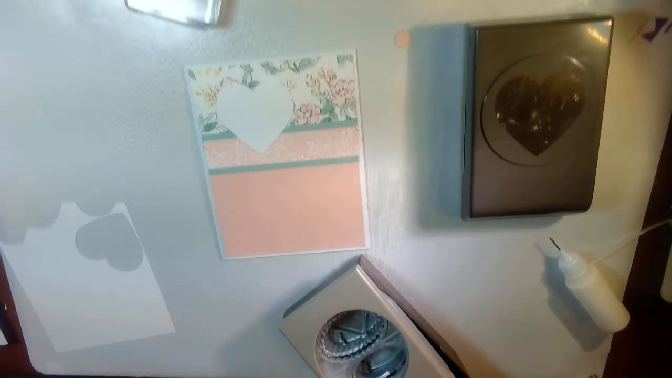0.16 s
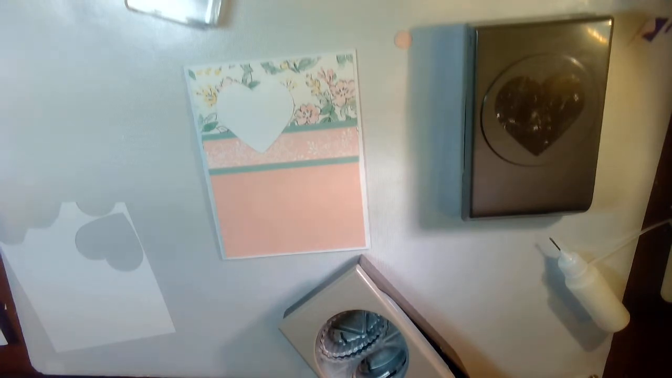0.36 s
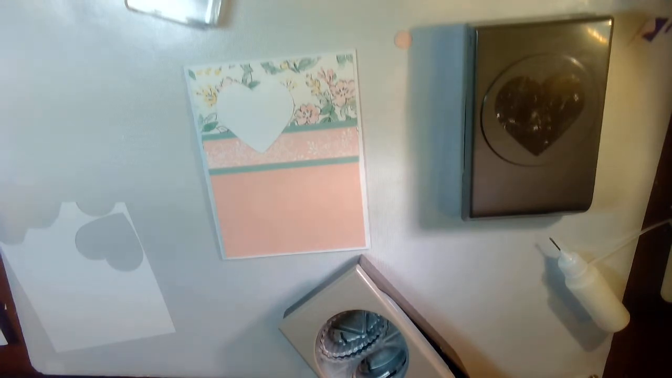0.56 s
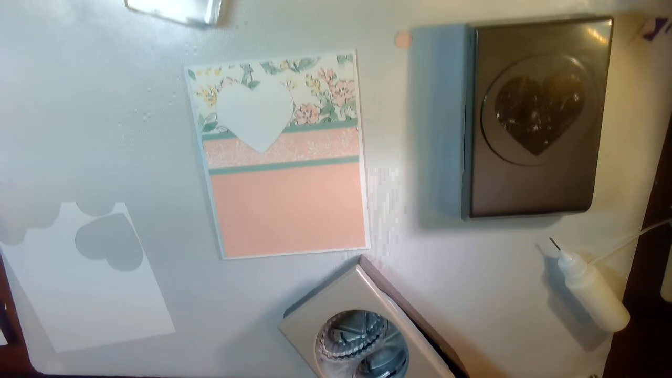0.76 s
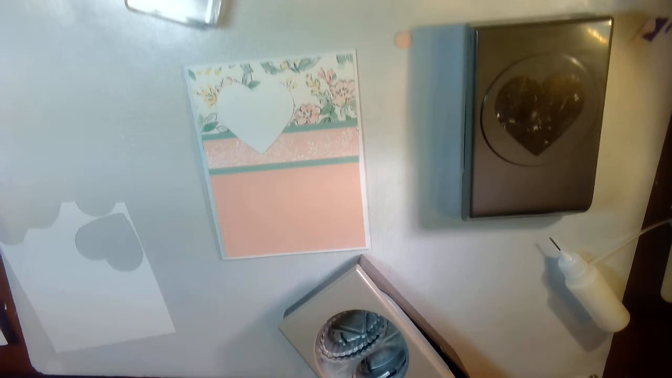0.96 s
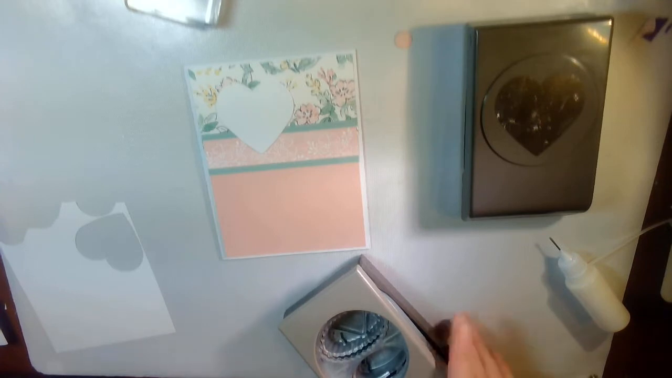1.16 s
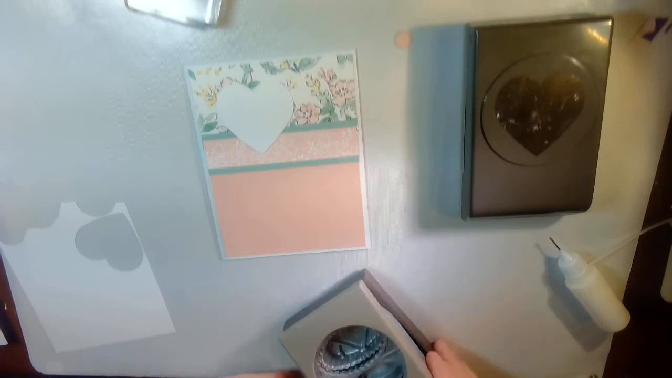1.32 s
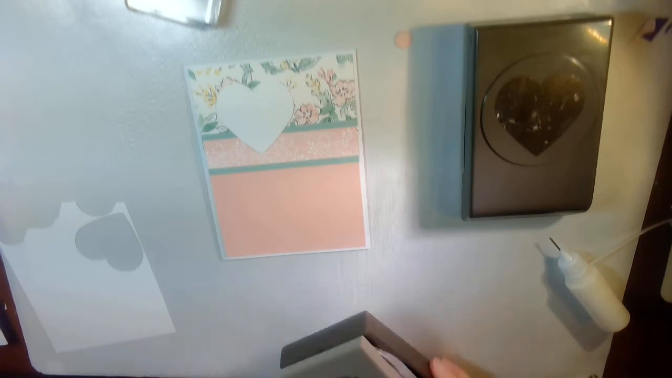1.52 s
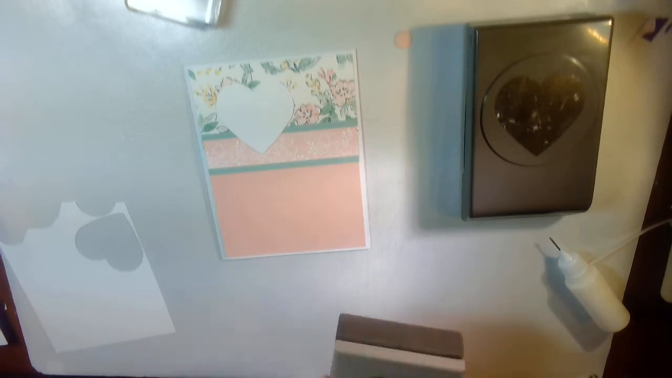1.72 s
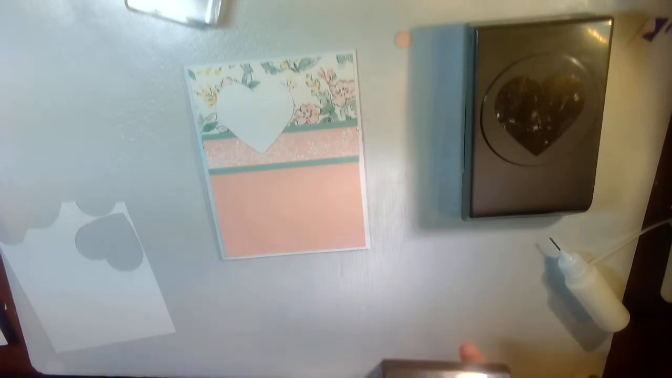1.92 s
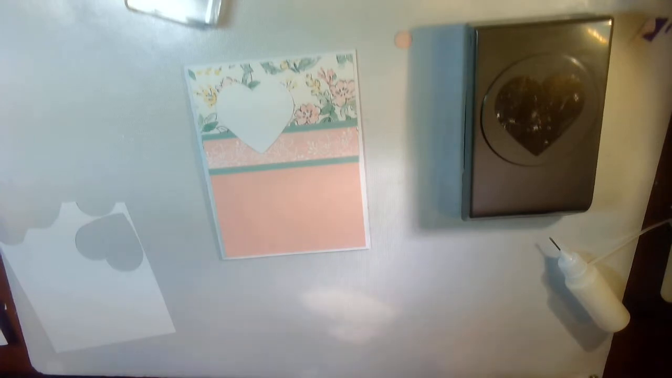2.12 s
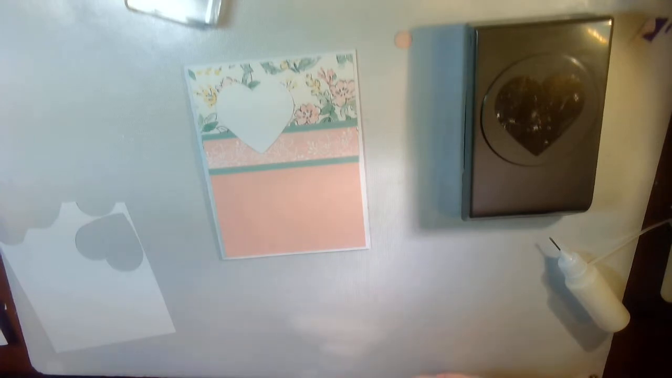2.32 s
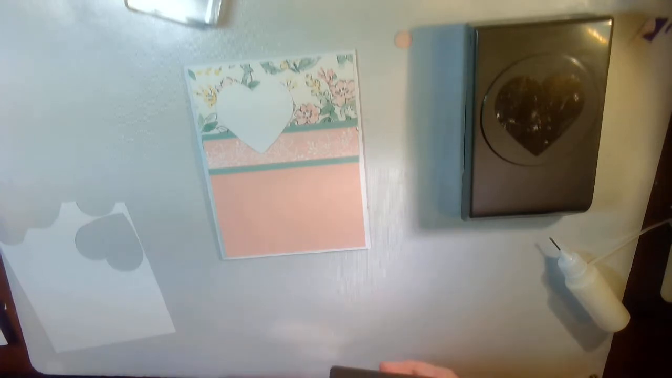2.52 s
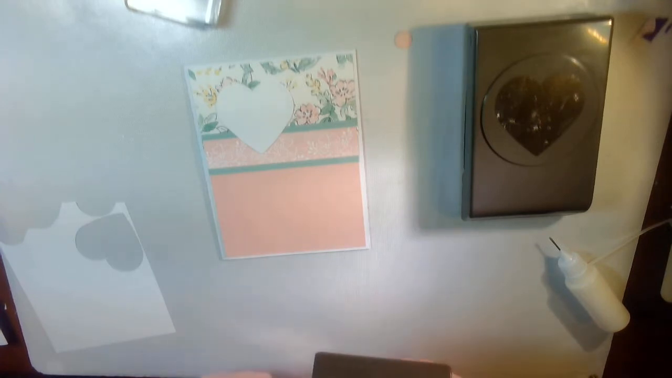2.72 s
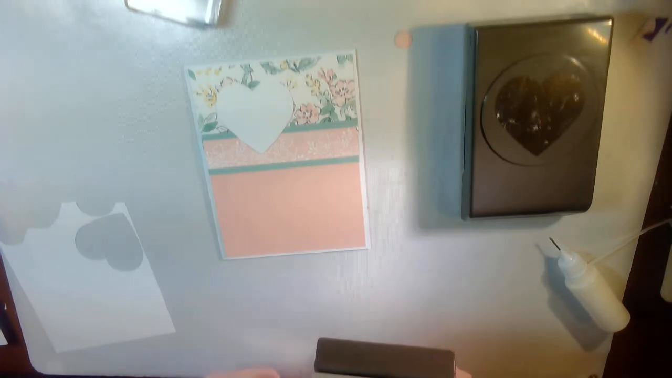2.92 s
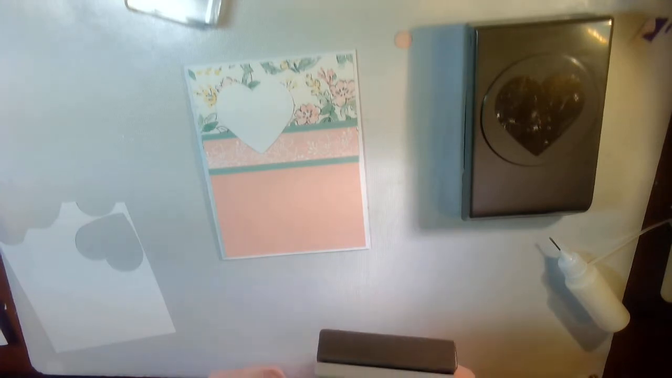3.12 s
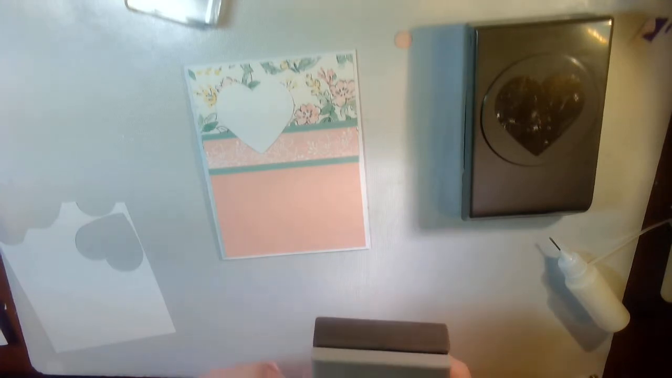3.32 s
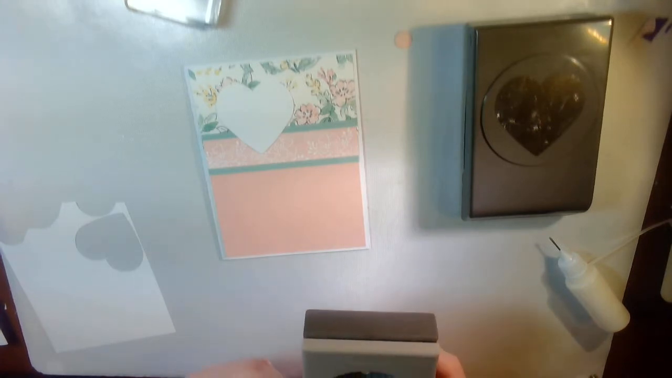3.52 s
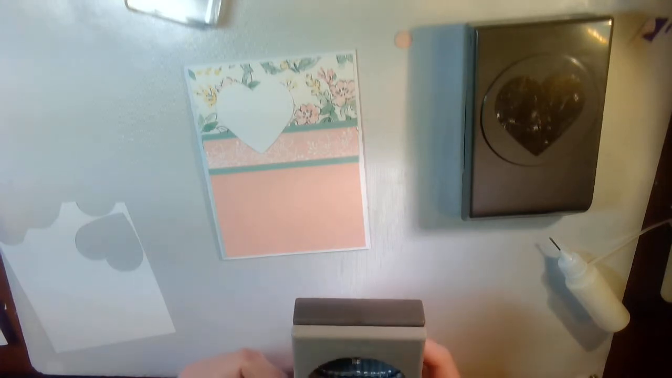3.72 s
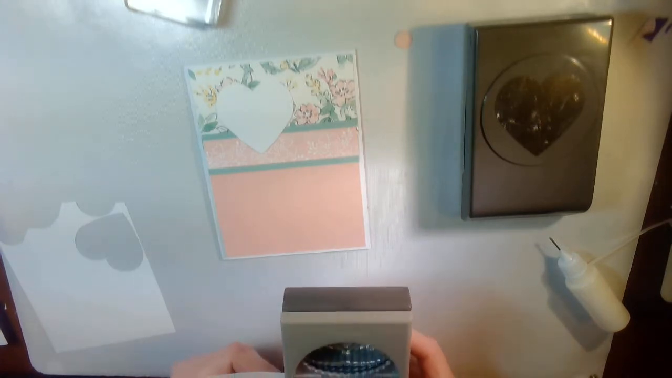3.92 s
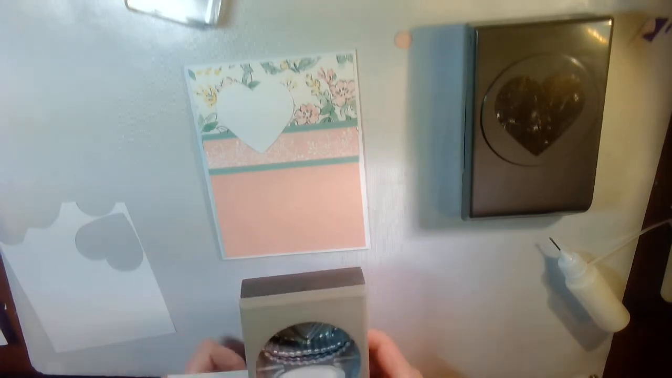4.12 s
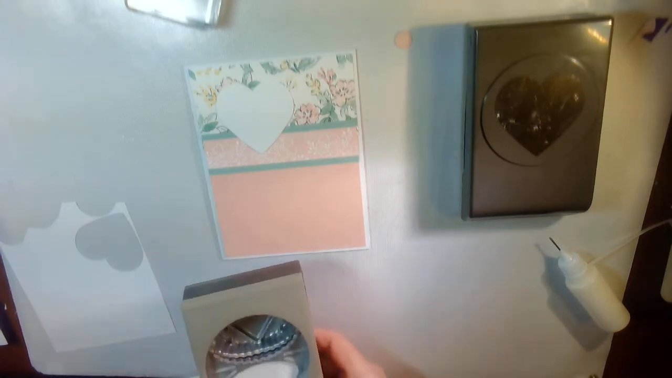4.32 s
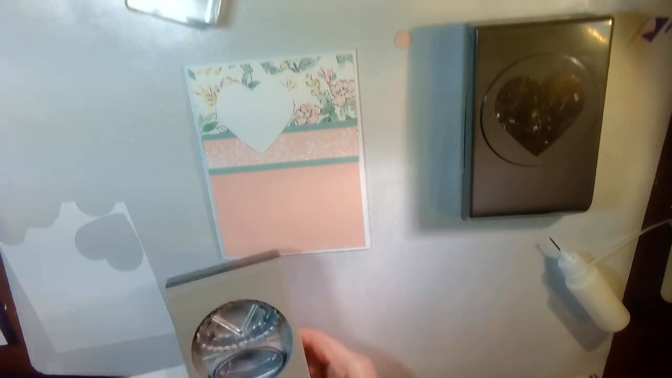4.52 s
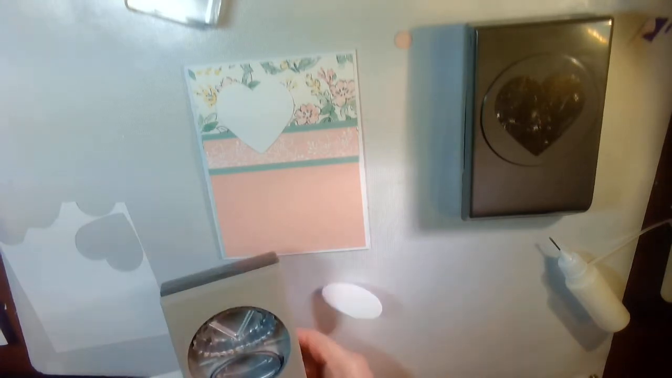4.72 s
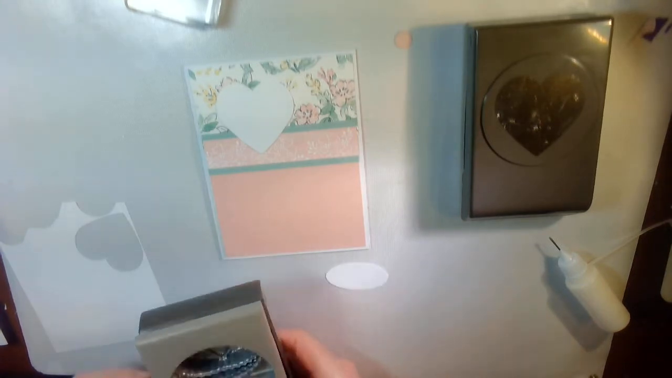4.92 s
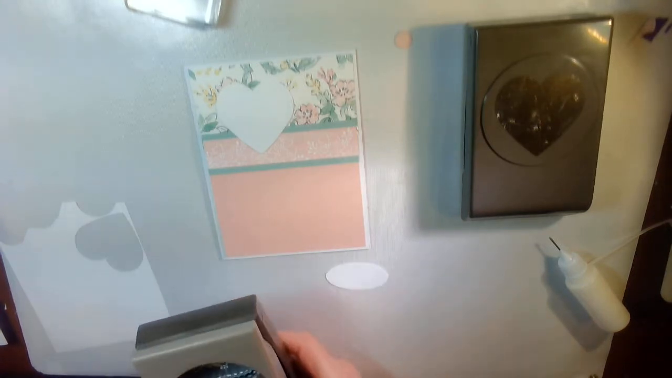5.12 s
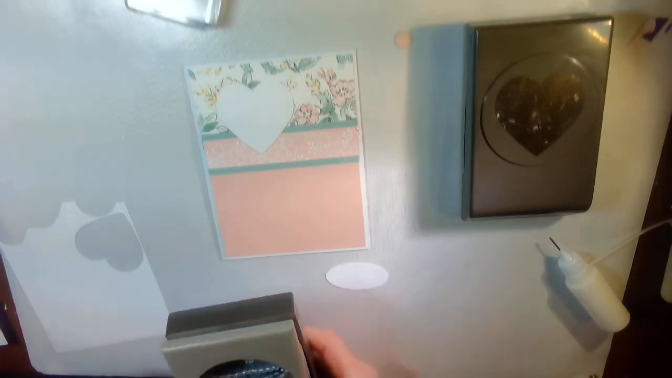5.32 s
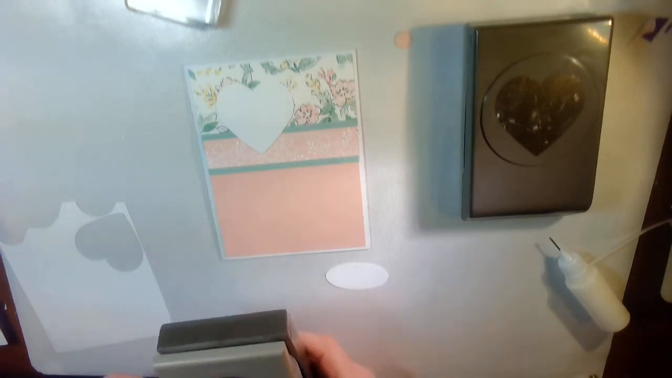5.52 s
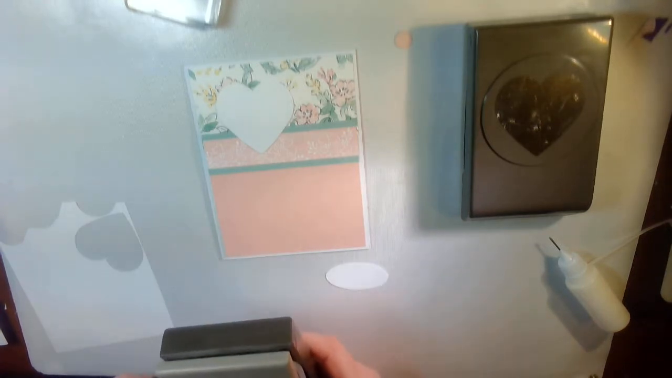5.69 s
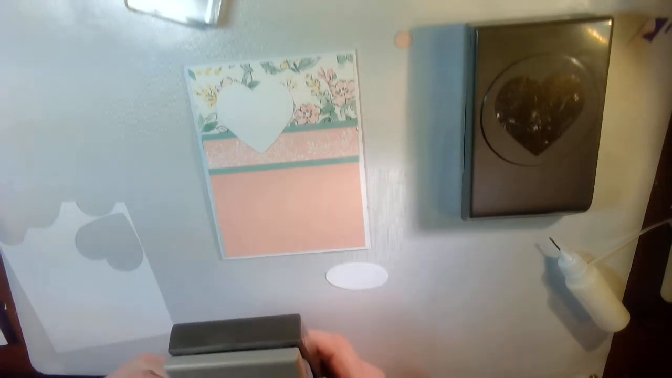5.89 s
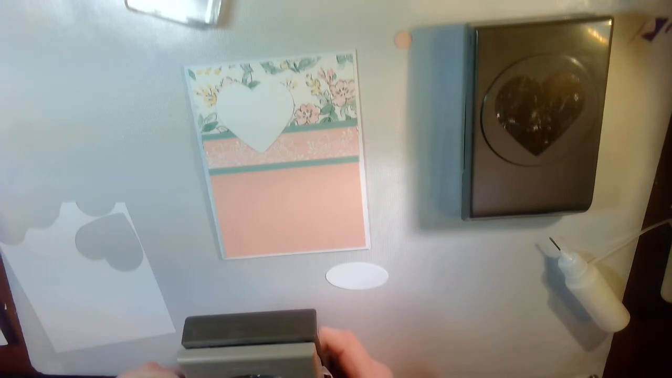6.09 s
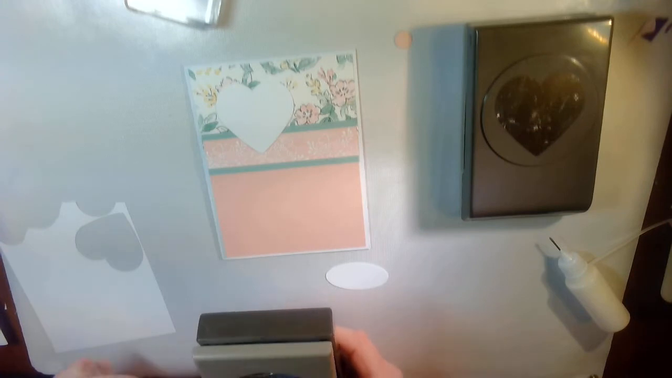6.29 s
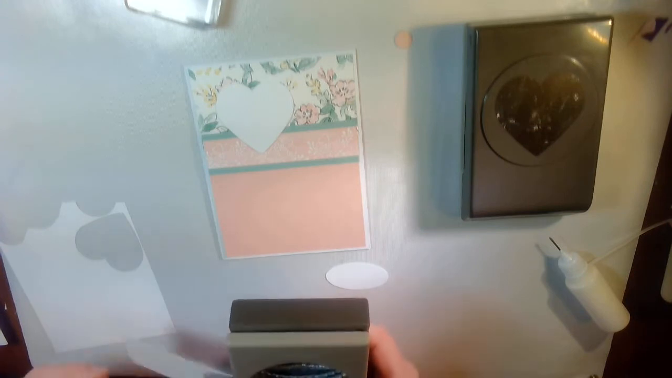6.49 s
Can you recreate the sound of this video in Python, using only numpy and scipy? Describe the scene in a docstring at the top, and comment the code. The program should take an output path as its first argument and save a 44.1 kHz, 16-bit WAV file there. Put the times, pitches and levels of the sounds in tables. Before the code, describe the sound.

Soft paper rubbing and crisp little ticks come first, with a dull table knock as a punch is dragged away and a tiny plastic squeak. After a sparse, nearly silent pause with faint brushes, a very loud double-edged metallic crunch cuts card, with a short room tail. Rougher paper scrapes and snaps follow. Dry, close, treble-peaky sound over constant low electronic noise.

```python
"""First a sheet of paper slides softly over steady electronic noise, then it snaps and rustles under the hands.
A hand punch drags off the table, its housing squeaks, and its die crunches through card; handling goes on.
Slides are noise shaped by hand pressure, snaps are ticks with short bursts of noise, and the punch,
housing and table are noise sent through resonances. All is close to a small, peaky microphone,
and the crunch overloads the input."""
import sys
import numpy as np
from scipy import signal
from scipy.fft import rfft, irfft
from scipy.io import wavfile

SR = 44100
rng = np.random.default_rng(int(sys.argv[2]) if len(sys.argv) > 2 else 0)


def unload_audio(sound):
    """Save the sound as a 16-bit wav file, at the path given as the first command line argument."""
    columns = np.transpose(np.atleast_2d(sound))
    # keep every value between -1 and 1, then stretch to whole-number steps
    steps = np.round(np.clip(columns, -1, 1) * 32767)
    wavfile.write(sys.argv[1], SR, steps.astype(np.int16))


def convert_level_to_amplitude(level_db):
    """Map a level in decibels to its linear amplitude factor."""
    exponent = np.asarray(level_db, float) / 20
    return 10 ** exponent


N = 288855


def rms_one(x):
    """Scale a sound to an average strength (rms) of 1."""
    return x / np.sqrt(np.mean(x ** 2) + 1e-20)


def colour(x, spectrum, size=4096):
    """Minimum-phase filter of unit energy, so nothing sounds before its cause."""
    hz, db = np.transpose(spectrum)
    grid = np.maximum(np.arange(size // 2 + 1) * SR / size, 1)
    gain = convert_level_to_amplitude(np.interp(np.log(grid), np.log(hz), db))
    # folding the cepstrum forward in time makes the filter minimum-phase
    cepstrum = irfft(np.log(gain), size)
    cepstrum[1:size // 2] *= 2
    cepstrum[size // 2 + 1:] = 0
    taps = irfft(np.exp(rfft(cepstrum)), size)
    return signal.fftconvolve(x, taps / np.linalg.norm(taps))[:N]


def drift(rate_hz):
    """Slow random wandering with an rms of 1; a higher rate wanders faster."""
    r = np.exp(-2 * np.pi * rate_hz / SR)
    noise = rng.standard_normal(N + SR)
    wander = signal.lfilter([1], [1, -2 * r, r * r], noise)
    return rms_one(wander[SR:])   # the first second lets the filter settle


def resonance(x, hz, width_hz):
    """One ringing mode; the narrower it is, the longer it rings."""
    r = np.exp(-np.pi * width_hz / SR)
    feedback = [1, -2 * r * np.cos(2 * np.pi * hz / SR), r * r]
    return signal.lfilter([(1 - r * r) / 2, 0, (r * r - 1) / 2], feedback, x)


def modes(x, rows):
    """Parallel resonances of alternating sign; a 0 dB one passes unit energy."""
    total = 0
    for k, (hz, width_hz, db) in enumerate(rows):
        unit_energy = np.sqrt(SR / np.pi / width_hz)
        total = total + (-1) ** k * convert_level_to_amplitude(db) * unit_energy * resonance(x, hz, width_hz)
    return total


def patchy_body(x, rows, patch_db):
    """Resonances that each swell and fade by themselves."""
    total = 0
    for k, mode in enumerate(rows):
        wandering = x * convert_level_to_amplitude(patch_db * drift(16.0))
        total = total + (-1) ** k * modes(wandering, [mode])
    return total


def burst(s, rise_ms, hold_ms, dying_ms):
    """Where a burst lies (up to half a second) and its rise, hold and exponential decay."""
    ms = np.arange(SR // 2) * 1000 / SR
    rise = np.minimum(ms / rise_ms, 1) ** 2
    decay = np.exp(-np.maximum(ms - rise_ms - hold_ms, 0) / dying_ms)
    at = round(s * SR)
    return slice(at, at + len(ms)), (rise * decay)[:N - at]


# tone of the steady electronic noise; above 15.9 kHz the treble ends steeply: f/Hz, level/dB (relative)
FLOOR_SPECTRUM = [(12, -29.5), (20, 3), (114, -6.5), (184, -12), (465, -17), (3830, -27), (12800, -30.5),
                  (15900, -27.5), (16400, -64)]


def floor():
    floor_db, whine_db = -56, -71.5
    whine_hz, pass_width_hz = 12750, 260
    white = rng.standard_normal((2, N))
    whine = white[1]
    for _ in range(2):   # two passes narrow the band further
        whine = resonance(whine, whine_hz, pass_width_hz)
    return convert_level_to_amplitude(floor_db) * colour(white[0], FLOOR_SPECTRUM) + convert_level_to_amplitude(whine_db) * rms_one(whine)


def thin_edge_hiss(x):
    """Thin paper edges hiss mostly above 6 kHz."""
    return signal.sosfilt(signal.butter(2, 6000, "high", fs=SR, output="sos"), x)


# strokes of the hand over the sheets, each a pair:
# how the sheet is held: low body level/dB, high body level/dB, hiss level/dB (re the stroke);
# then how hard the slide presses: t/s, level/dB
STROKES = [((-3.5, -1, -25), [(0, -57.5), (.2, -55.5)]), ((-3.5, -2.5, -9.5), [(.2, -64), (.235, -43.5),
           (.29, -46.5), (.315, -43), (.44, -48.5), (.53, -52), (.6, -63.5)]), ((-11.5, -12, -5.5),
           [(.79, -61), (.835, -51), (.872, -50), (.88, -59)]), ((-7.5, -16, -0.5), [(.918, -52.5),
           (.94, -60), (.977, -49), (1.012, -51), (1.04, -65)]), ((-18, -4.5, -41), [(1.195, -47.5),
           (1.27, -62.5), (1.32, -56.5), (1.39, -46), (1.44, -70)]), ((-9, -5, -2.2), [(1.44, -60),
           (1.59, -58)]), ((-12, 0, -8), [(1.59, -56), (1.63, -49), (1.67, -45), (1.73, -59)]),
           ((-34, -2.9, -18), [(1.73, -60), (1.757, -43.5), (1.82, -42), (1.828, -53)]),
           ((-10.5, -5.5, -14), [(2.222, -53.5), (2.4, -48), (2.51, -48), (2.535, -31), (2.58, -49),
           (2.6, -42), (2.65, -54)]), ((-6.5, -6, -6.5), [(2.66, -50), (2.78, -52.5), (2.8, -63)]),
           ((-10.5, -2.5, -22), [(2.79, -57.5), (3.05, -60.5), (3.14, -70.5)]), ((-11, -2.6, -16.5),
           [(4.755, -45.5), (4.78, -43.5), (4.84, -50), (4.875, -37.5), (4.893, -42.5), (4.912, -32.5),
           (4.94, -49.5), (4.975, -61)]), ((-11.5, -6, -21.5), [(4.975, -57.5), (5.15, -53.5), (5.2, -49),
           (5.25, -51), (5.32, -59)]), ((-16.5, -12, -12.5), [(5.325, -56.5), (5.35, -40.5), (5.385, -40.5),
           (5.4, -31), (5.43, -39.5), (5.48, -35), (5.51, -40), (5.55, -57)]), ((-10, -6, -10.5),
           [(5.59, -61.5), (5.63, -48.5), (5.66, -53.5), (5.84, -67)]), ((-14.5, -4.5, -9), [(5.87, -64),
           (5.97, -56.5), (6.02, -51.5), (6.06, -58.5), (6.11, -69)]), ((-15, -23.5, -9.5), [(6.126, -54.5),
           (6.18, -42.5), (6.225, -33), (6.27, -37), (6.33, -44), (6.343, -35.5), (6.364, -33.5),
           (6.369, -46), (6.42, -57)]), ((-17, -16.5, -14), [(6.42, -82), (6.455, -46), (6.549, -74)])]
# lone brushes of a finger on paper: t/s, length/ms, level/dB
BRUSHES = [(0.72, 14, -49), (2.06, 87, -61.5), (3.51, 24.4, -55.5), (3.964, 61, -54), (4.06, 100, -65),
           (4.201, 60, -66.5)]
# tone of a brush: low body level/dB, high body level/dB, hiss level/dB (re the brush)
BRUSH_COLOUR = (-12.5, 0, -15)
# treble peaks of paper, mostly the microphone's own; snaps use them too: f/Hz, width/Hz, level/dB
EDGE_MODES = [(4500, 806, 3.5), (5062, 950, 1), (3990, 940, -9), (6100, 2900, -8.5)]
# low modes, then high modes of the sheets: f/Hz, width/Hz, level/dB
BODY_MODES = [(480, 790, -10.5), (1040, 204, -5.5), (1245, 520, -1.5), (1910, 760, 0)], [(2434, 470, -7.5),
              (3204, 240, -8.5)]
# the table top heard through the sheet: f/Hz, width/Hz, level/dB
UNDER_MODES = [(363, 270, 5.5)]


def shares_db(low_db, high_db, hiss_db):
    """Levels of edge, table, low body, high body and hiss; sheets that lie flat let the table through."""
    table_db = 2.5 + 4.2 * low_db   # flat sheets sound low
    return np.array([0, table_db, low_db, high_db, hiss_db])[:, None]


def hand_pressure():
    """Power of the rubbing in each of the five parts of the sound."""
    stir_db = -71   # hands are never quite still
    fade_s, fade_db = 0.06, 13   # the sheet settles after each stroke
    press = np.zeros((5, N))
    press[0] = convert_level_to_amplitude(stir_db) ** 2
    for held_db, rows in STROKES:
        last_s, last_db = rows[-1]
        s, level_db = np.transpose(rows + [(last_s + fade_s, last_db - fade_db)])
        where = np.arange(round(s[0] * SR), min(round(s[-1] * SR), N))
        pressing_db = np.interp(where / SR, s, level_db)
        press[:, where] += convert_level_to_amplitude(pressing_db + shares_db(*held_db)) ** 2
    for s, length_ms, level_db in BRUSHES:
        where, shape = burst(s, 5.8, length_ms, 5.8)
        press[:, where] += (convert_level_to_amplitude(level_db + shares_db(*BRUSH_COLOUR)) * shape) ** 2   # powers add
    return press


def sliding():
    """Fibres catch in clumped grains over smooth friction, as hard as the hand presses."""
    grains_per_s, ticks_per_s, tick_db = 600, 100, 1   # ticks: stray fibres that catch hard, re grains
    spread_db, smooth = -1.5, 0.91   # spread of grain sizes; smooth share of the friction
    clump_db, rasp_db = 1.5, 1.45   # slower and faster unevenness
    edge_patch_db, body_patch_db = 1.5, 3.5   # how far each part wanders
    press = hand_pressure()
    sizes = convert_level_to_amplitude(spread_db * np.minimum(rng.exponential(1, N), 4)) * rng.choice([-1, 1], N)
    chance = rng.random(N)
    catches = (chance < grains_per_s / SR) + convert_level_to_amplitude(tick_db) * (chance < ticks_per_s / SR)
    grains = rms_one(sizes * catches)
    rub = smooth * rng.standard_normal((5, N)) + np.sqrt(1 - smooth ** 2) * grains
    unevenness = convert_level_to_amplitude(clump_db * drift(45) + rasp_db * drift(160))
    rub = rub * np.sqrt(press) * unevenness + 1e-18   # the tiny offset keeps the filters from stalling
    edge, under, low, high, hiss = rub
    treble = patchy_body(edge, EDGE_MODES, edge_patch_db)
    treble = treble + thin_edge_hiss(hiss * convert_level_to_amplitude(body_patch_db * drift(2.3)))
    body = patchy_body(low, BODY_MODES[0], body_patch_db) + patchy_body(high, BODY_MODES[1], body_patch_db)
    return treble + modes(under, UNDER_MODES) + body


# creases and contacts letting go: t/s, level/dB (relative), f/Hz of the patch that rings
SNAPS = [(0.054, -32, 2380), (0.3071, -23, 1170), (0.532, -35.5, 7800), (0.7184, -30, 1110),
         (0.87, -36, 2270), (0.9482, -20.5, 2080), (1.0127, -23, 1320), (1.017, -22, 4340),
         (1.1701, -34, 2600), (1.1994, -26.5, 2620), (1.3727, -31, 2780), (1.411, -20.5, 4730),
         (1.4223, -18.5, 2430), (1.666, -17, 2940), (2.1039, -40.5, 1350), (2.2229, -18, 4130),
         (2.2266, -50, 4600), (2.2303, -17.5, 1020), (2.237, -37, 4700), (2.245, -17.5, 4350),
         (2.2562, -25, 1350), (2.274, -37, 4500), (2.369, -29, 4800), (2.452, -32, 1450),
         (2.53, -22.5, 2950), (3.154, -41.5, 4630), (3.706, -46.5, 2810), (4.7096, -28.5, 1450),
         (4.7359, -23.5, 3600), (4.7584, -27, 2530), (4.7762, -25, 2960), (4.8744, -20, 3100),
         (4.9078, -22.5, 3030), (5.097, -31, 1600), (5.3975, -17, 4700), (5.411, -25.5, 1630),
         (6.2286, -15, 1090), (6.268, -26.5, 900), (6.273, -18.5, 4700), (6.34, -20.5, 4160),
         (6.351, -19.5, 1140), (6.3791, -20.5, 4700), (6.449, -29, 3530)]


def snaps():
    """Each release ticks, bursts into brief noise, rings a patch of its own size and leaves a weak flutter."""
    crest_db, tick_db, hiss_db = -11.5, 3.5, -22.5
    rise_ms, dying_ms = 0.8, 1.1
    flutter_db, flutter_ms = -9.5, 6.5
    sharpness = 4.1   # patch frequency over its width
    patch_db, patch_follows, usual_snap_db = -24, 0.83, -23   # the patch grows slower than the tick
    edge, body, tick = np.zeros((3, N))
    white = rng.choice([-1, 1], (3, N))
    for s, peak_db, hz in SNAPS:
        start_s = s - rise_ms / 2000   # half the rise comes before the tick
        where, sudden = burst(start_s, rise_ms, 0.36, dying_ms)
        flutter = burst(start_s, rise_ms, 0.5, flutter_ms)[1]
        shape = convert_level_to_amplitude(crest_db) * (sudden + convert_level_to_amplitude(flutter_db) * flutter)
        edge[where] += convert_level_to_amplitude(peak_db) * shape
        tick[round(s * SR)] = convert_level_to_amplitude(peak_db + tick_db)
        ring_db = patch_db + patch_follows * (peak_db - usual_snap_db)
        body[where] += modes(shape * white[1, where], [(hz, hz / sharpness, ring_db)])
    treble = modes(edge * white[0] + tick, EDGE_MODES)
    hiss = thin_edge_hiss(convert_level_to_amplitude(hiss_db) * (edge * white[2] + tick))
    return treble + hiss + body


def room(x):
    """A short, dull, dense tail of echoes."""
    t60_s, level_db, cut_hz = 0.26, -17, 3200
    t = np.arange(SR // 2) / SR
    tail = rng.standard_normal(len(t)) * convert_level_to_amplitude(-60 * t / t60_s) * (t > .004)   # echoes need 4 ms to arrive
    tail = signal.sosfilt(signal.butter(1, cut_hz, fs=SR, output="sos"), tail)
    return convert_level_to_amplitude(level_db) * signal.fftconvolve(x, tail / np.linalg.norm(tail))[:N]


# shaking of the table top: t/s, sway level/dB, panel level/dB, hold/ms
TABLE_SHAKES = [(1.166, -31, -43, 9.7), (1.198, -48.5, -47.5, 35), (1.33, -51, -46.5, 110),
                (1.421, -61, -42, 64), (4.474, -31.5, -43, 51)]
# sway modes, then panel modes of the table: f/Hz, width/Hz, level/dB
TABLE_MODES = [(42, 7.8, 0)], [(108, 26, -1.5), (143, 12, 3), (248, 20, -16.5), (330, 150, -13)]


def table():
    """The top shakes in its low modes while the punch drags off it and when it snaps shut."""
    shake = np.zeros((2, N))
    for s, sway_db, panel_db, hold_ms in TABLE_SHAKES:
        where, shape = burst(s, 6.0, hold_ms, 14.0)
        shake[:, where] += convert_level_to_amplitude(np.array([[sway_db], [panel_db]])) * shape
    sway, panel = shake * rng.standard_normal((2, N)) + 1e-18
    return modes(sway, TABLE_MODES[0]) + modes(panel, TABLE_MODES[1])


# plastic housing squeaking under the fingers: t/s, length/ms, level/dB
SQUEAKS = [(1.752, 31, -55.5), (1.784, 14, -42.5), (1.799, 7.5, -39.5), (1.813, 10, -43),
           (5.995, 42, -54.5)]
# modes of the housing: f/Hz, width/Hz, level/dB
HOUSING_MODES = [(1755, 68, -9.5), (2990, 150, 0.5), (3400, 110, 5)]


def squeaks():
    """Fluttering finger friction drives the housing's narrow modes."""
    press = np.zeros(N)
    for s, length_ms, db in SQUEAKS:
        where, shape = burst(s, 4.0, length_ms - 4, 3.0)
        press[where] += convert_level_to_amplitude(db) * shape
    flutter = convert_level_to_amplitude(3.1 * drift(69))
    friction = press * flutter * rng.standard_normal(N) + 1e-18
    return patchy_body(friction, HOUSING_MODES, 3.9)


# stages of the die shearing the card: t/s, level/dB (relative), rise/ms, hold/ms, dying time/ms
CUT_STAGES = [(4.394, -31, 5, 14, 14), (4.437, -18, 7, 3, 3), (4.4472, -9, .5, .3, 1.2),
              (4.4765, -1, 4, 9, 1.5), (4.49, -10, .6, 10, 2), (4.5013, -3, .8, 4.5, 1.2),
              (4.508, 0, .6, 13, 2.5), (4.522, -10, 1.2, 4, 12)]
# tone of the shearing noise: f/Hz, level/dB (relative)
CUT_SPECTRUM = [(120, -30.5), (250, -9.5), (870, -19.5), (4000, -3), (4860, 4), (5840, -9), (9000, -19),
                (16000, -22)]
# modes of the lever: f/Hz, width/Hz, level/dB
LEVER_MODES = [(639, 58, -23.5), (822, 50, -17.5), (1228, 61, -12.5), (1870, 160, -9)]


def punch():
    """Uneven shearing noise squeals in the die and drives the modes of the lever."""
    force_db, crunch_db = -6.0, 1.1   # overall level; unevenness
    through_s = 4.49   # the die breaks through
    biting_db, through_db = 3, -7.5   # squeal re force, before and after
    force, squeal = np.zeros((2, N))
    for s, db, rise_ms, hold_ms, dying_ms in CUT_STAGES:
        where, shape = burst(s, rise_ms, hold_ms, dying_ms)
        squeal_db = biting_db if s < through_s else through_db
        force[where] += convert_level_to_amplitude(db + force_db) * shape
        squeal[where] += convert_level_to_amplitude(db + force_db + squeal_db) * shape
    crunch = rng.standard_normal((2, N)) * convert_level_to_amplitude(crunch_db * drift(200))
    force, squeal = np.array([force, squeal]) * crunch + 1e-18
    die = modes(squeal, [(2150, 450, -4)])   # f/Hz, width/Hz, level/dB
    return colour(force, CUT_SPECTRUM) + modes(force, LEVER_MODES) + die


def scene():
    """Sharp sounds wake the room; the soft ones stay dry."""
    sharp = snaps() + punch()
    soft = floor() + sliding() + table() + squeaks()
    return (sharp + room(sharp) + soft)[None]


def roll_off(x):
    """The treble ends steeply here."""
    return signal.sosfilt(signal.butter(12, 16100, fs=SR, output="sos"), x)


def record(dry):
    """The input overloads on the cut, with a fairly sharp knee."""
    overload = 0.8   # highest level the input can reach
    mix = dry / (1 + np.abs(dry / overload) ** 4) ** (1 / 4)
    return roll_off(mix)


dry = scene()
out = record(dry)
unload_audio(out)
```